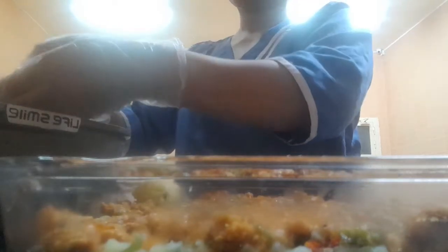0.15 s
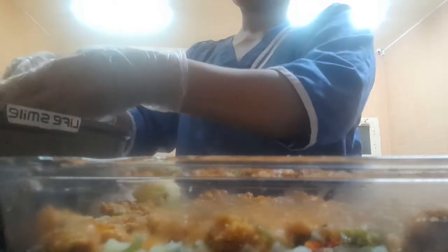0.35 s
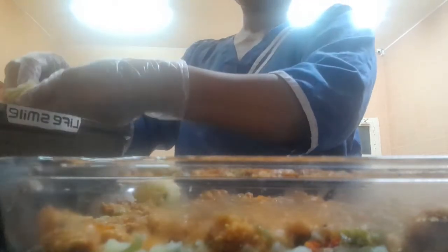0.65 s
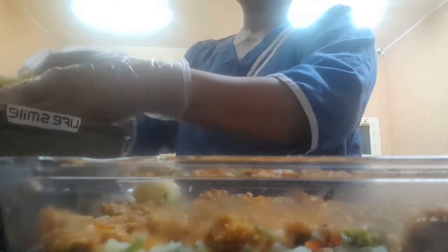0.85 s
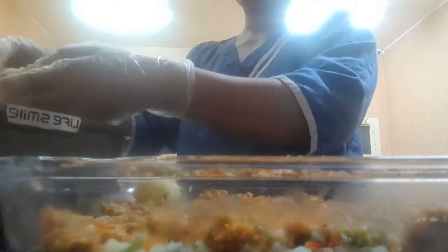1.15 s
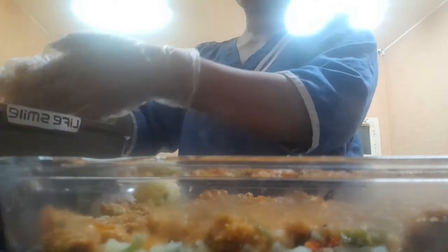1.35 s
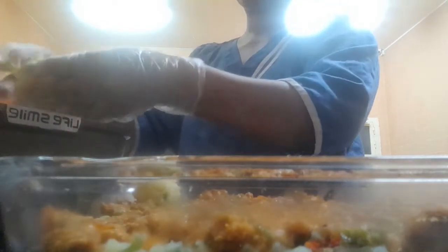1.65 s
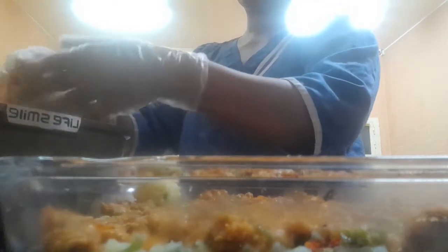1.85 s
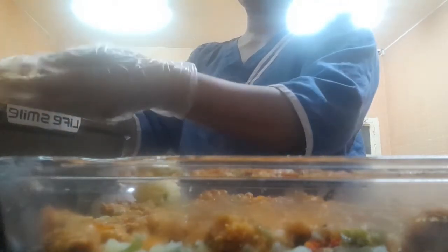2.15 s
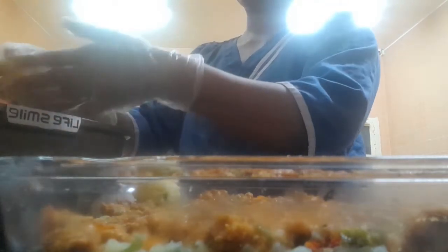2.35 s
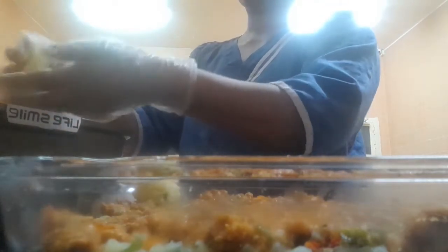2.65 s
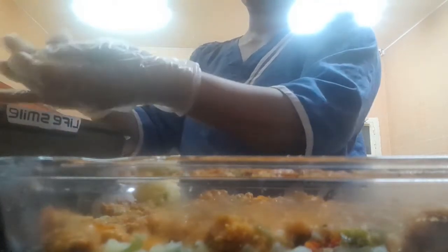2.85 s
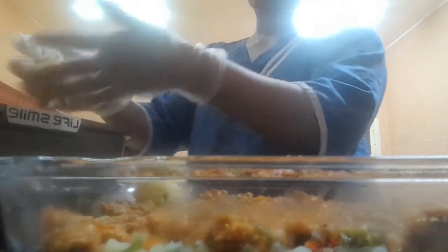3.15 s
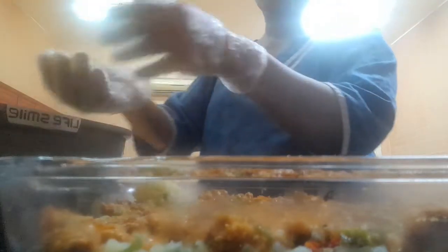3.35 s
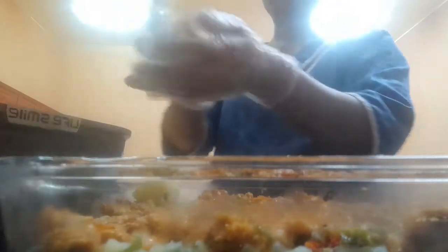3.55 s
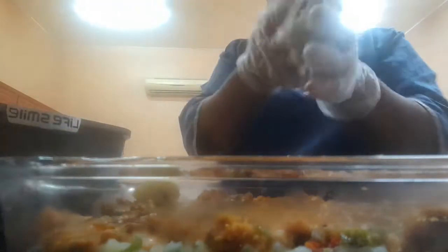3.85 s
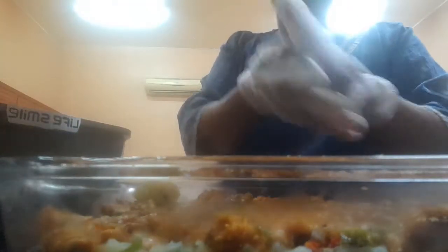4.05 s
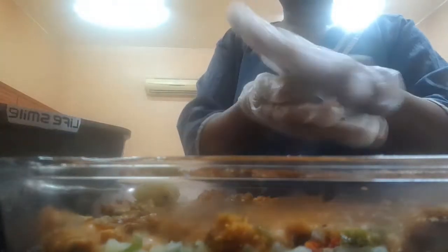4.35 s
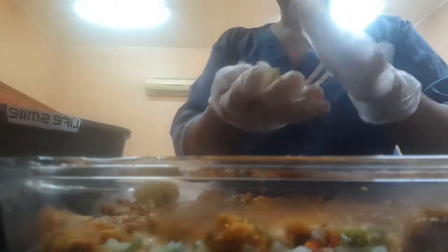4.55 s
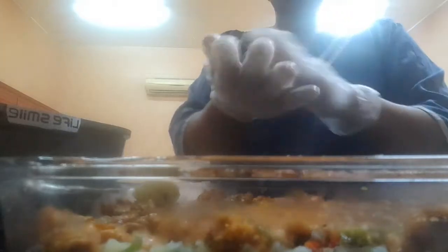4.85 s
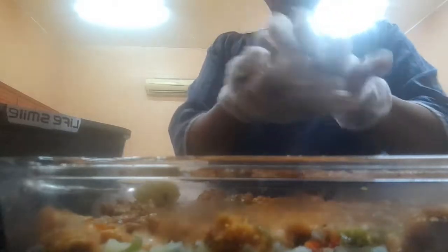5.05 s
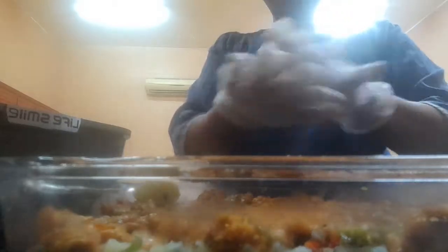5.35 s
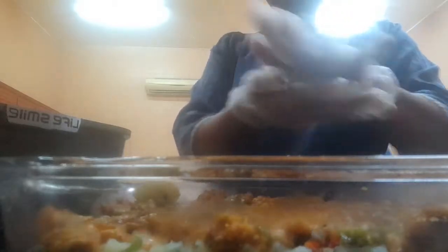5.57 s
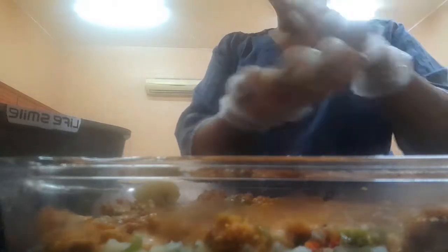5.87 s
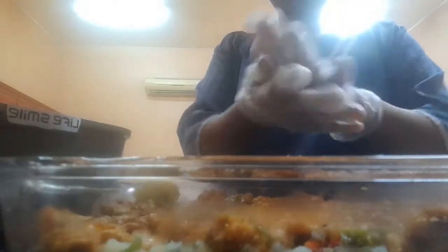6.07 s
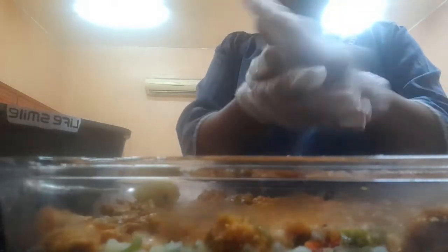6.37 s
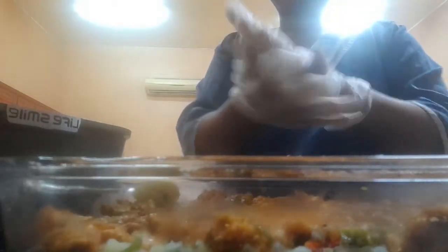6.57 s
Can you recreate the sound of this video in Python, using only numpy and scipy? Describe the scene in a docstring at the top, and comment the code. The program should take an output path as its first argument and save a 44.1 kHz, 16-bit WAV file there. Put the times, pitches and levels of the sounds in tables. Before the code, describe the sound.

Close, crisp plastic-glove crinkles and swishes over a continuous deep blower drone, sparse at first, then dense as food is pressed between palms.

```python
"""A room air conditioner runs steadily in a kitchen: two close motor hums beat beside steady tones,
turbulent noise shaped by smooth spectra makes the blower's rumble and rush, and a low resonance booms.
Close to the microphone a cook in thin plastic gloves scoops up food and presses it between the palms:
stick-slip snaps and noise make the rustles and swishes, short bursts the crinkles,
and a tick with one decaying mode the light tap on the food tub."""
import sys
import numpy as np
from scipy import signal
from scipy.fft import rfft, irfft, next_fast_len
from scipy.io import wavfile
from scipy.ndimage import uniform_filter1d

SR = 44100
rng = np.random.default_rng(int(sys.argv[2]) if len(sys.argv) > 2 else 0)


def materialize(psi):
    """Save the field psi as 16-bit PCM at rate SR to the path in sys.argv[1].

    A 1-D psi becomes a single channel; in a 2-D psi each row is a channel.
    """
    bounded = np.clip(np.atleast_2d(psi).T, -1, 1)
    quanta = np.round(bounded * 32767).astype(np.int16)
    wavfile.write(sys.argv[1], SR, quanta)


N = 295847
PADDED = next_fast_len(N, True)
TIME = np.arange(N) / SR  # s
FREQ = np.fft.rfftfreq(PADDED, 1 / SR)  # Hz


def amp(db):
    """Level: converts decibels to an amplitude gain."""
    return 10 ** (np.asarray(db) / 20)


def evened(x):
    """Normalization: scales to rms 1."""
    return x / np.sqrt(np.mean(x ** 2) + 1e-20)


def read(rows):
    """Spectral interpolation: joins points linearly on a log-frequency axis."""
    hz, value = np.transpose(rows)
    return np.interp(np.log(FREQ + 1), np.log(hz + 1), value)


def follow(rows):
    """Envelope: joins points in time by straight lines, at every sample."""
    return np.interp(TIME, *np.transpose(rows))


def colour(x, gain):
    """Linear filtering: multiplies the spectrum by a gain for each frequency."""
    return irfft(rfft(x, PADDED) * gain, PADDED)[..., :N]


def drift(hz):
    """Slow random fluctuation: noise low-passed at about hz, with rms 1."""
    lowpass = np.exp(-(FREQ / hz) ** 2) * (FREQ > 0)
    return evened(colour(rng.standard_normal(N), lowpass))


def pair(mid, side):
    """Sum and difference: left and right from their common and opposed parts."""
    return np.array([mid + side, mid - side])


def octave_band(hz, centre_hz, octaves):
    """Band-pass: a Gaussian on the octave axis, with its standard deviation in octaves."""
    return np.exp(-.5 * (np.log2(hz / centre_hz) / octaves) ** 2)


def sides(left_db):
    """Level difference: raises the left by left_db and lowers the right as much."""
    return amp([[left_db], [-left_db]])


def motors(waver_turns=0.034, waver_hz=0.44):
    """Beating: the compressor slips behind the mains, so two close hums interfere; other tones waver in phase."""
    # steady tones of the motors and fan: pitch_hz, level_db (rms)
    steady_tones = [(48.95, -54), (80.92, -56), (97.95, -56), (125.04, -52), (145.98, -50), (187.11, -54),
                    (275.6, -53), (294.27, -57), (376, -54), (407.28, -58), (533.5, -60), (869.5, -64)]
    # level of the compressor's hum, before the shares below: time_s, level_db
    hum_level = [(0.0, -55.5), (2.15, -43.5), (2.9, -53), (3.25, -47.5), (5.15, -43.5), (5.85, -59),
                 (6.6, -41.5)]
    shaft_hz, mains_hz = 97.24, 100.05  # twice the shaft rate and twice the mains rate
    shaft_db, mains_db = 3.5, -1  # shares in the hum
    beat_crest_s = 4.0  # both hums are in phase here
    start_turns = rng.random()
    hum = np.zeros(N)
    for hz, db in ((shaft_hz, shaft_db), (mains_hz, mains_db)):
        hum += amp(db) * np.cos(2 * np.pi * (hz * (TIME - beat_crest_s) + start_turns))
    hum *= amp(follow(hum_level))
    for hz, db in steady_tones:
        turns = hz * TIME + rng.random() + waver_turns * drift(waver_hz)
        hum += amp(db) * np.cos(2 * np.pi * turns)
    return np.sqrt(2) * hum  # a cosine of rms 1 has a peak of root 2


def blower(flutter_db=0.5, flutter_hz=9, ripple_db=1.1, ripple_hz=8, ripple_from_hz=400):
    """Turbulence and room modes: broadband air noise, partly alike on both sides, with a rippled spectrum."""
    # rumble and rush common to both sides, before lean and ripple: pitch_hz, density_db (per Hz)
    common_air = [(20, -93), (42, -97), (58.6, -65.5), (78, -61), (90, -66), (112, -56.5), (171, -59.5),
                  (215, -58.5), (265, -62.5), (305, -62), (345, -61), (378, -59), (456, -62.5), (508, -68),
                  (570, -68.5), (625, -64.5), (700, -69), (795, -71), (880, -71.5), (1080, -80),
                  (1260, -78.5), (1350, -84.5), (1650, -82), (1915, -82), (2080, -86.5), (2430, -85.5),
                  (2680, -91), (2830, -90), (3130, -98), (3640, -95), (4380, -97), (5400, -100.5),
                  (6630, -101.5), (7400, -100), (8600, -109), (11500, -108.5), (14000, -121)]
    # the part of the air noise opposed between left and right, shaped by the spacing of
    # the microphone's ports, before lean and ripple: pitch_hz, density_db (per Hz)
    opposed_air = [(20, -112), (42, -106), (58.6, -70.5), (90, -85), (107, -80), (171, -71), (222, -69),
                   (310, -72), (430, -69), (500, -68), (535, -71), (580, -69.5), (760, -71.5), (960, -72.5),
                   (1040, -74), (1180, -77), (1320, -78.5), (1600, -80.3), (1820, -82), (1980, -82.5),
                   (2200, -87), (2420, -94), (3080, -91), (3600, -96), (4380, -97), (5600, -100),
                   (6630, -110), (8600, -113), (11500, -118), (14000, -125)]
    # balance of the sides: pitch_hz, left_minus_right_db
    air_balance = [(60, 1.5), (99, 0), (160, -3), (270, 1), (450, -2.5), (740, -2.5), (1220, -2.3),
                   (1400, -3.5), (1640, -0.7), (1950, -5.5), (2150, -4), (2450, -3.5), (3330, -3.5),
                   (4100, -0.5), (5500, -1.5), (9080, 1.5), (15000, 1)]
    white = rng.standard_normal((2, N)) * np.sqrt(SR / 2)  # unit power per Hz
    mid = colour(white[0], amp(read(common_air)))
    side = colour(white[1], amp(read(opposed_air)))
    lean = amp(read(air_balance) / 2)
    # standing waves: random ripples about ripple_hz wide, deepening above ripple_from_hz
    ripple_bins = round(ripple_hz / FREQ[1])
    ripple = evened(uniform_filter1d(rng.standard_normal((2, len(FREQ))), size=ripple_bins))
    room = evened(amp(ripple_db * ripple * FREQ / (FREQ + ripple_from_hz)))
    air = colour(pair(mid, side), room * np.array([lean, 1 / lean]))
    return air * amp(flutter_db * drift(flutter_hz))


def casing(centre_hz=138.6, width_hz=39, level_db=-3.5, side_db=-22, steadiness=0.83):
    """Forced resonance: the blower stirs one broad low mode, whose boom swells and sinks."""
    # level of the boom, before level_db: time_s, level_db
    boom_level = [(0.0, -28.5), (0.13, -45), (0.28, -29.5), (0.52, -40), (0.63, -32.5), (0.98, -32.5),
                  (1.14, -43), (1.5, -31.5), (2.6, -31.5), (2.85, -39.5), (3.35, -31), (3.6, -35),
                  (5.25, -36), (5.4, -51), (5.53, -31), (6.08, -36.5), (6.22, -31), (6.71, -35.5)]
    resonance = 1 / np.sqrt(1 + (2 * (FREQ - centre_hz) / width_hz) ** 4)
    mid, side = evened(colour(rng.standard_normal((2, N)), resonance))
    # partly level the noise's own swells
    power = abs(uniform_filter1d(mid ** 2, size=7000)) + 1e-6
    mid = evened(mid / power ** (steadiness / 2))
    return pair(mid, amp(side_db) * side) * amp(follow(boom_level) + level_db)


def gloves(level_db=1, slips_per_s=450, fold_octaves=0.47, crackle_share=0.65,
           clump_db=2.5, clump_hz=90, sheen_hz=13700, side_db=-9):
    """Stick-slip friction: film snaps in five bands, with sharper pops and a hiss, all in clumps."""
    # colour of the plastic film: pitch_hz, relative_db (per Hz)
    film_colour = [(1000, -16), (2500, 4), (4500, 7), (5500, 6), (6200, 4), (6900, 7), (7450, 9.5),
                   (8400, -3), (9650, 3), (10200, -3), (11100, 4), (12400, 8), (14000, 7), (15600, 5)]
    slips = np.zeros((2, N))
    for centre_hz in np.geomspace(3500, 14500, num=5):
        snaps = rng.choice([-1, 1], (2, N)) * (rng.random(N) < slips_per_s / SR)
        slips += colour(snaps, octave_band(FREQ + 1, centre_hz, fold_octaves))
    hiss = rng.standard_normal((2, N))
    friction = evened(slips) + crackle_share * crackle() + hiss
    friction *= amp(clump_db * np.tanh(drift(clump_hz)))
    film = evened(colour(friction, amp(read(film_colour))))
    below = colour(film, .5 - .5 * np.tanh((FREQ - sheen_hz) / 900))
    above = film - below
    body_gain, sheen_gain = rubbing()
    mid, side = below * body_gain + above * sheen_gain
    return pair(mid, amp(side_db) * side) * amp(level_db)


def rubbing(stir_db=-75, stir_sheen_db=-6, stir_wander_db=2, stir_hz=5, crest_share=0.34, width=0.99):
    """Power addition: slides swell and fade over the hands' faint stirring; gains of body and sheen."""
    # slides of the film as the hand moves, levels at the crest before the gloves' common gain:
    # start_s, length_s, level_db, sheen_db (extra)
    slides = [(0.93, 0.075, -61.5, 1), (1.72, 0.21, -67, -5), (2.02, .09, -66, -3), (2.57, .07, -62, -3),
              (2.71, 0.12, -67, -3), (3.05, 0.17, -65, -4), (3.4, 0.19, -67, -4), (3.57, 0.08, -58, -1),
              (3.635, 0.13, -60, -1), (3.728, 0.043, -61, 2), (3.786, 0.063, -62, -2),
              (3.862, .05, -56.5, 1), (3.92, 0.12, -66, -2), (4.09, 0.13, -60.5, 1), (4.26, .09, -67, 0),
              (4.365, 0.05, -55, 0), (4.403, .04, -60, 2), (4.65, 0.25, -67, -2), (4.85, 0.13, -54.5, -5.5),
              (4.98, 0.12, -64, -2), (5.18, .13, -65.5, 0), (5.238, 0.06, -62, 1), (5.45, 0.22, -66, -2),
              (5.66, 0.091, -64.5, 0), (5.997, 0.076, -58.5, 4), (6.1, 0.093, -67, 3), (6.25, 0.15, -64, 1),
              (6.44, 0.16, -66, 3), (6.625, 0.058, -59, 0)]
    body = amp(stir_db + stir_wander_db * drift(stir_hz)) ** 2
    sheen = body * amp(stir_sheen_db) ** 2
    for start_s, length_s, db, sheen_db in slides:
        past = (TIME - start_s) / length_s - crest_share
        # -1 at the start, 0 at the crest, 1 at the end
        away = past / np.where(past < 0, crest_share, 1 - crest_share)
        power = amp(db) ** 2 / np.cosh(np.clip(away / width, -20, 20) * np.sqrt(2)) ** 2
        body = body + power
        sheen = sheen + power * amp(sheen_db) ** 2
    return np.sqrt(body), np.sqrt(sheen)


def crackle(pops_per_s=110, spread_db=6.0, fall_s=0.00068):
    """Impulsive release: tiny creases pop at random, each a broadband burst that decays exponentially."""
    pops = rng.random(N) < pops_per_s / SR
    sizes = amp(spread_db * np.minimum(rng.exponential(1, N), 3)) * pops
    bursts = signal.lfilter([1], [1, -np.exp(-1 / (fall_s * SR))], sizes)
    return evened(bursts * rng.standard_normal((2, N)))


def palms(octaves=0.52, grain_db=3, grain_hz=200, side_db=-7, left_db=1):
    """Sliding friction under load: firm pressure swells a full, grainy band of noise."""
    # strokes of palm over palm, level of the common part at full pressure before the side balance:
    # start_s, length_s, level_db (rms), centre_hz
    palm_strokes = [(3.066, 0.035, -66, 5600), (3.11, 0.065, -62, 5600), (3.556, 0.067, -60, 5600),
                    (3.625, 0.14, -64.5, 6000), (3.786, 0.09, -61, 5940), (4.85, 0.16, -62, 8200),
                    (4.93, 0.18, -67, 6500), (5.21, .07, -65, 5800), (5.568, 0.049, -64, 5200),
                    (6.036, 0.035, -61.5, 4600), (6.28, 0.078, -61, 4600), (6.603, .04, -62, 5000)]
    out = np.zeros((2, N))
    friction = rng.standard_normal((2, N)) * amp(grain_db * drift(grain_hz))
    for start_s, length_s, db, centre_hz in palm_strokes:
        mid, side = evened(colour(friction, octave_band(FREQ + 1, centre_hz, octaves)))
        pressure = np.sin(np.pi * np.clip((TIME - start_s) / length_s, 0, 1))
        out += pair(mid, amp(side_db) * side) * amp(db) * pressure
    return out * sides(left_db)


def crinkles(level_db=-12.0, snap_level_db=-12.0, rise_s=0.00053, fall_s=0.0016, tail_db=-16, tail_s=0.017,
             octaves=0.38, side_db=-9, snap_hz=12500, snap_octaves=0.33):
    """Buckling: a fold gives way in a short burst with a bright snap, and the walls return a faint tail."""
    # single crinkles of a glove, levels before the common level_db and snap_level_db:
    # start_s, fold_db, left_minus_right_db, centre_hz, snap_db
    fold_events = [(0.4444, -49, -1.0, 4070, -44), (0.852, -47, 0.0, 7000, -42),
                   (2.5852, -43, 0.5, 4850, -50), (3.0749, -39, 0.5, 5600, -56),
                   (3.083, -42, 0.5, 5600, -58), (3.149, -43, 0.5, 6200, -55), (3.574, -41, 2, 5500, -48),
                   (3.8711, -37, -1.0, 4690, -43), (4.168, -38, 4, 4500, -46), (4.2438, -42, 2, 4060, -43),
                   (4.2965, -42, 6, 4570, -38), (4.3733, -45, 1, 5140, -44), (4.7323, -42, 1, 4200, -51),
                   (4.838, -39, 1, 5200, -56), (4.8478, -38, 3, 9500, -39), (4.8817, -38, 0.5, 7000, -43),
                   (4.981, -48, 1, 7000, -48), (5.0104, -47, 1, 7000, -44), (5.0478, -48, 1, 7000, -43.5),
                   (5.087, -50, 1, 7000, -47), (5.173, -48, 3, 4220, -41), (5.184, -49, 3, 6000, -45),
                   (5.212, -51, 1, 6000, -48), (5.459, -46, 0, 7550, -43), (5.549, -42, 1, 5500, -52),
                   (5.595, -41, 1, 4800, -47), (5.972, -43, 0, 4200, -60), (6.047, -37, 3, 5000, -41),
                   (6.064, -41, 1, 4500, -51), (6.164, -44, 9, 7000, -47), (6.1913, -47, 2.5, 4310, -40),
                   (6.2622, -36, 2.0, 4430, -45), (6.296, -38, 1.5, 5200, -45),
                   (6.3235, -37, 2.5, 4300, -52), (6.4411, -37, 4, 5480, -35),
                   (6.4857, -38, 1.5, 4400, -46), (6.5384, -45, -0.5, 5050, -43),
                   (6.5778, -45, -2, 5150, -41), (6.621, -41, 1, 4600, -54)]
    t = np.arange(4096) / SR
    hz = np.fft.rfftfreq(len(t), 1 / SR) + 1
    decay = np.exp(-t / fall_s) + amp(tail_db) * np.exp(-t / tail_s)
    shape = (1 - np.exp(-t / rise_s)) * decay
    snap = evened(octave_band(hz, snap_hz, snap_octaves))
    out = np.zeros((2, N + len(t)))
    for start_s, fold_db, pan_db, centre_hz, snap_db in fold_events:
        fold = evened(octave_band(hz, centre_hz, octaves) / (1 + (3500 / hz) ** 4))
        # fold and snap add in power
        band = np.hypot(amp(fold_db + level_db) * fold, amp(snap_db + snap_level_db) * snap)
        mid, side = irfft(rfft(rng.standard_normal((2, len(t)))) * band) * shape
        at = round(start_s * SR)
        out[:, at:at + len(t)] += pair(mid, amp(side_db) * side) * sides(pan_db / 2)
    return out[:, :N]


def tub(tap_s=1.2822, ring_hz=6240, ring_db=-49, ring_t60_s=.018,
        tick_db=-49.0, tick_s=0.00052, tick_hz=6000, left_db=3):
    """Impact and modal decay: a broad tick at the contact, with one short high mode."""
    t = np.maximum(TIME - tap_s, 0)
    band = (FREQ / tick_hz) ** 6 / (1 + (FREQ / tick_hz) ** 7.7)
    pulse = (t / tick_s) * np.exp(1 - t / tick_s)  # peaks at tick_s
    tick = evened(colour(rng.standard_normal(N), band)) * amp(tick_db) * pulse
    ring = amp(ring_db - 60 * t / ring_t60_s) * np.sin(2 * np.pi * ring_hz * t)
    return (tick + ring) * sides(left_db)


def scene():
    """Superposition: the machine across the room and the hands nearby."""
    machine = motors() + blower() + casing()
    hands = gloves() + palms() + crinkles() + tub()
    return machine + hands


def record(dry, bass_hz=36, edge_hz=15750, fade_s=.004):
    """Band limiting: the microphone sheds the deepest bass; a steep low-pass follows softened ends."""
    highpass = signal.butter(4, bass_hz, "high", fs=SR, output="sos")
    thinned = signal.sosfilt(highpass, dry)
    ends = np.clip(np.minimum(TIME, TIME[-1] - TIME) / fade_s, 0, 1)
    taps = signal.firwin(801, edge_hz, window=("kaiser", 9), fs=SR)
    return signal.oaconvolve(thinned * ends, taps[None], "same")


dry = scene()
out = record(dry)
materialize(out)
```